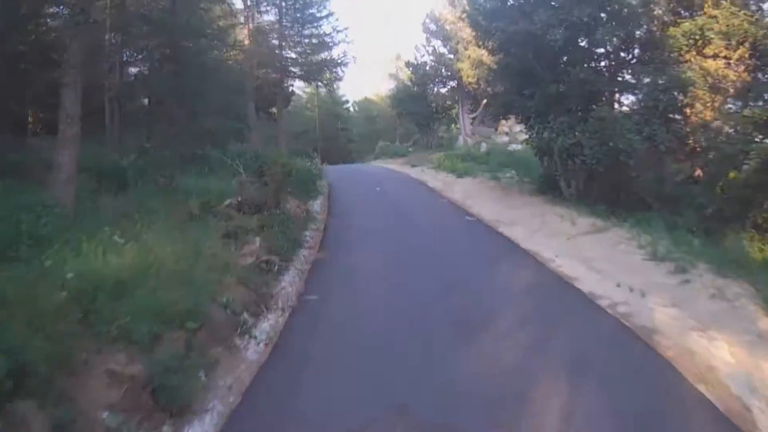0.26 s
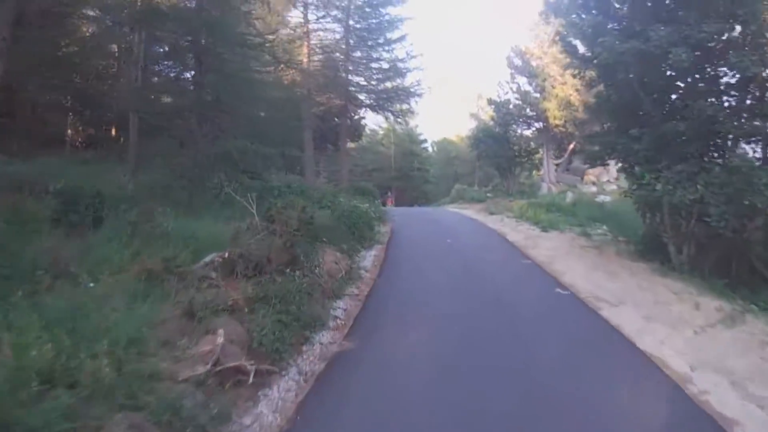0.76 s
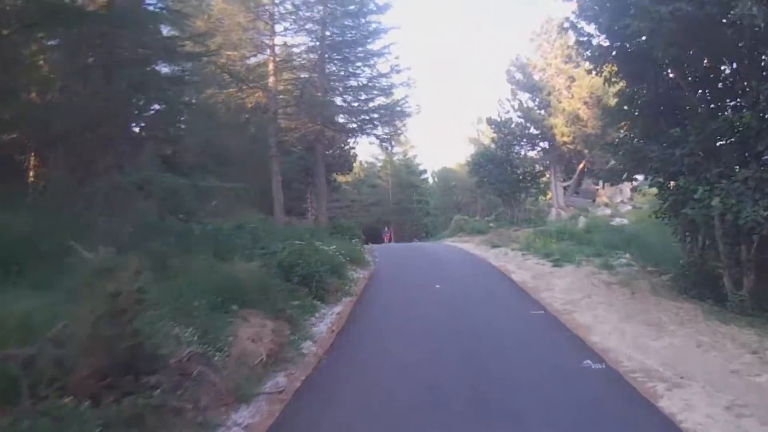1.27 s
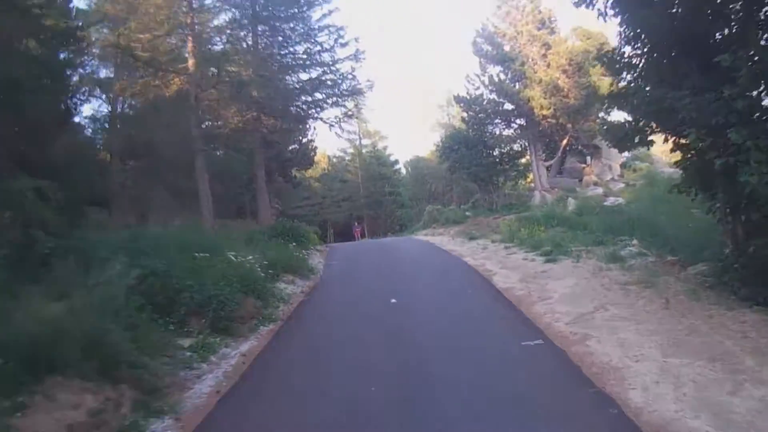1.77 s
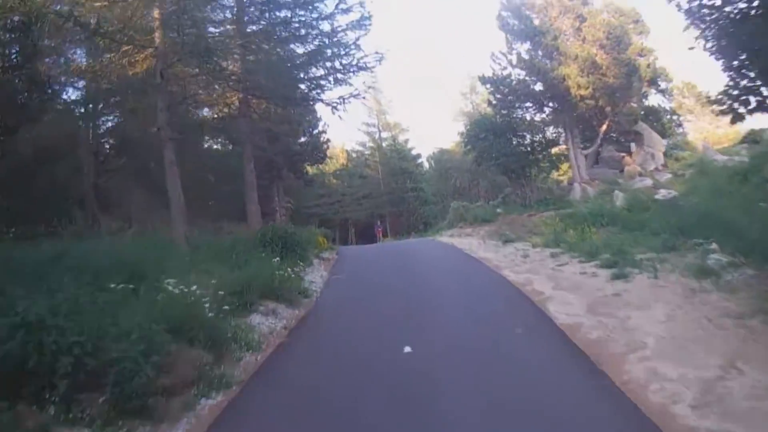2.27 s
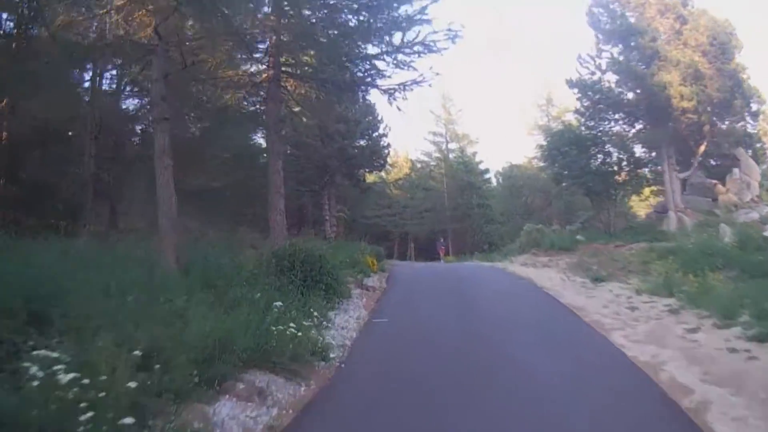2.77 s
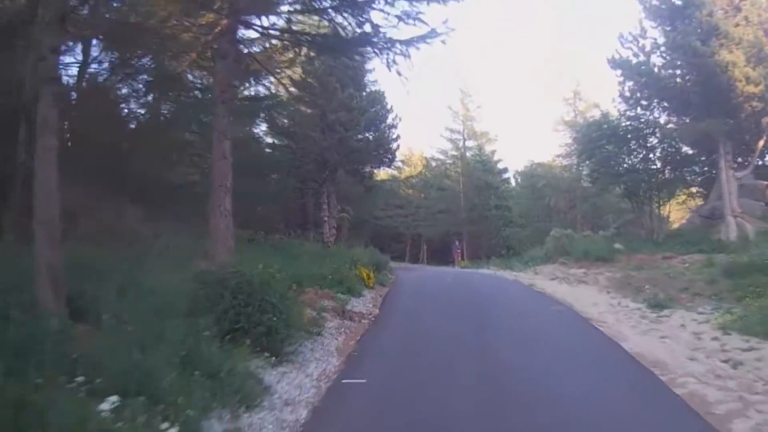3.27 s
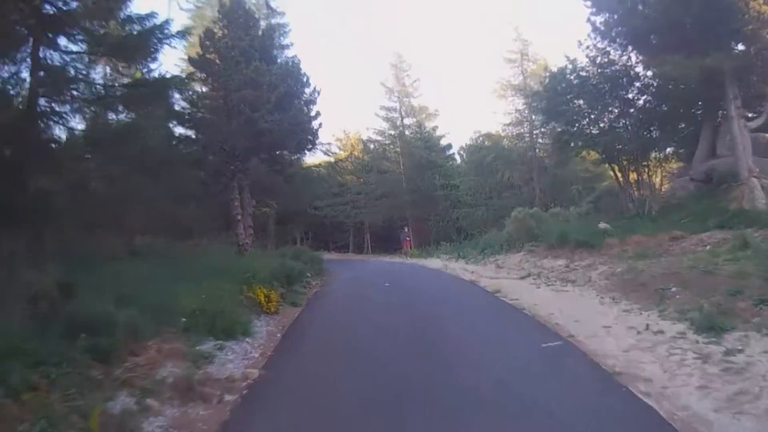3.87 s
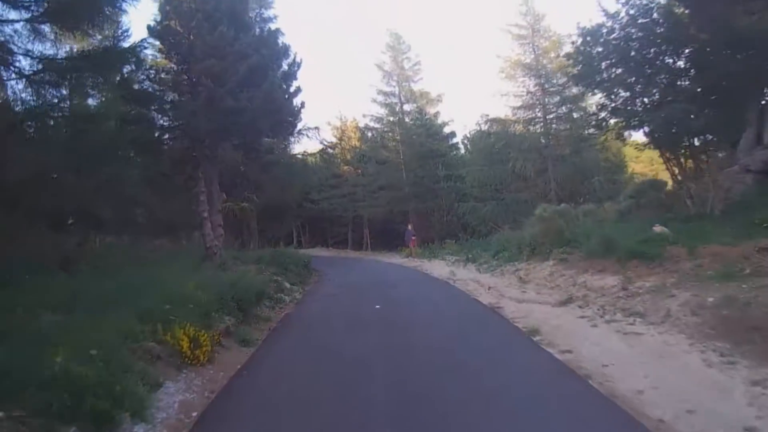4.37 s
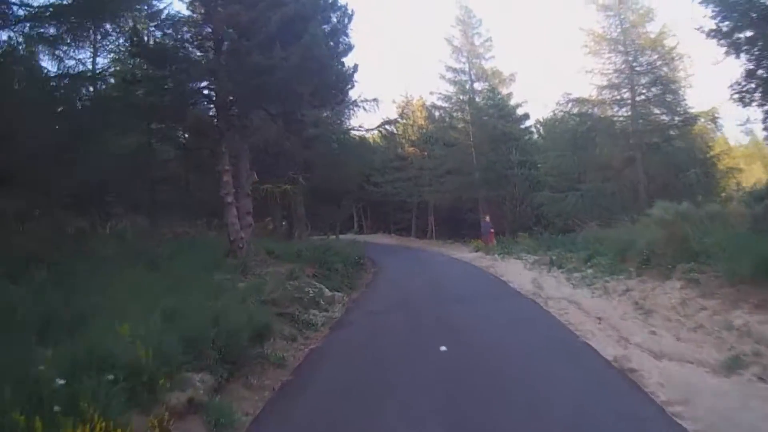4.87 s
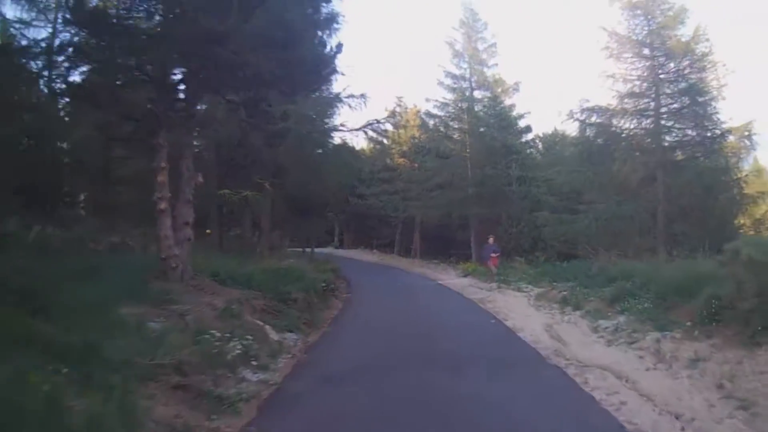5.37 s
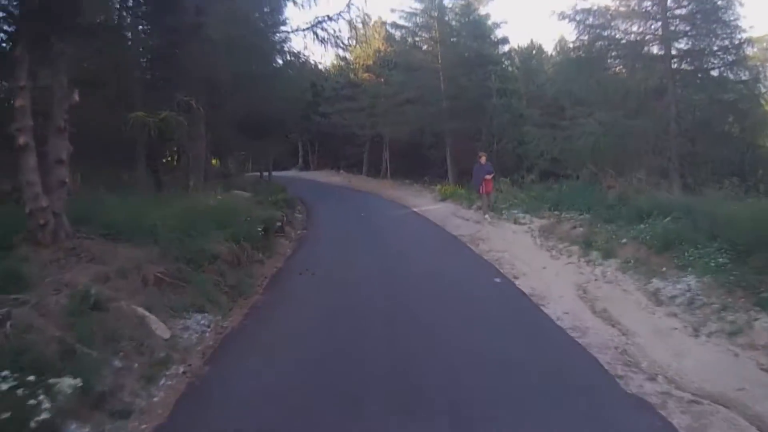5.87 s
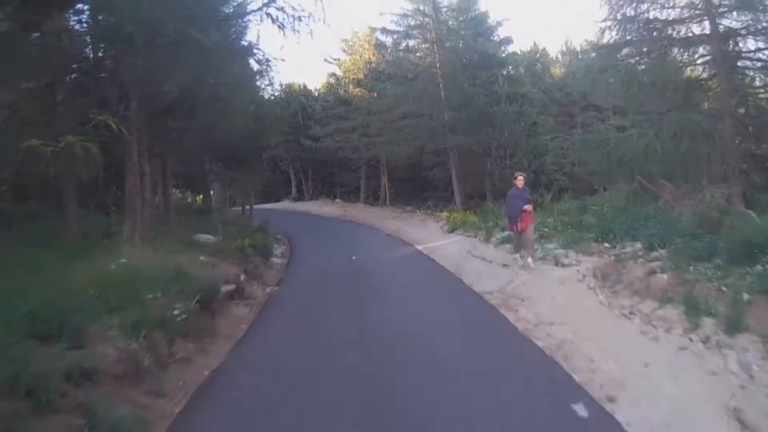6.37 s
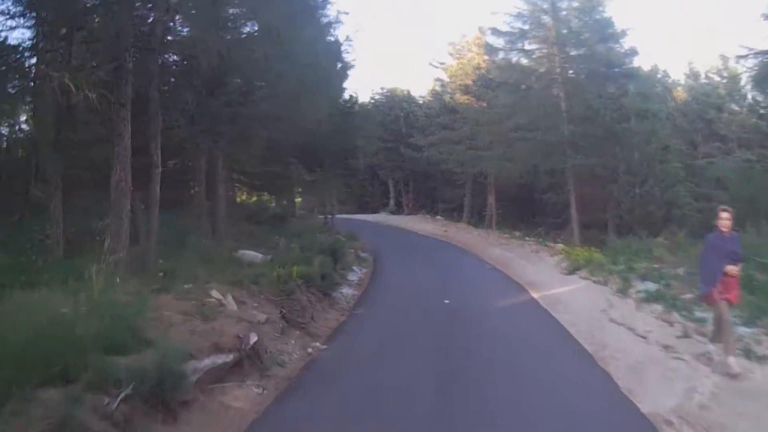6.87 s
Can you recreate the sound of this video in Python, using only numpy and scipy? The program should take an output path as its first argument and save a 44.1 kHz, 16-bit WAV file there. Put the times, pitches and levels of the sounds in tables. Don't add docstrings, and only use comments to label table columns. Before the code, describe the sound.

A longboard rolls along a paved forest road, low wooden rumble and dry gritty patter with small stone ticks and muffled wind buffeting.

```python
import sys
import numpy as np
from scipy import signal
from scipy.fft import rfft, irfft
from scipy.io import wavfile
from scipy.ndimage import uniform_filter1d, map_coordinates

SR = 44100
rng = np.random.default_rng(int(sys.argv[2]) if len(sys.argv) > 2 else 0)


def convert_level_to_amplitude(level_db):
    exponent = np.asarray(level_db, float) / 20
    return 10 ** exponent


def to_wav(sig):
    pcm = np.clip(np.atleast_2d(sig), -1, 1) * 32767
    pcm = np.round(pcm).astype(np.int16)
    wavfile.write(sys.argv[1], SR, pcm.T)


N = 313992


def unit(x):
    return x / np.sqrt(np.mean(x ** 2) + 1e-20)


def noise():
    return rng.standard_normal(N)


def wobble(rate):
    knots = rng.standard_normal(int(N * rate / SR) + 4)
    return map_coordinates(knots, [np.arange(N) * rate / SR])


def swing(table):
    return np.interp(np.arange(N) / SR, *np.transpose(table))


def coloured(x, spectrum):
    hz, db = np.transpose(spectrum)
    grid = np.fft.rfftfreq(8192, 1 / SR)
    gain = convert_level_to_amplitude(np.interp(np.log(grid + 1), np.log(hz + 1), db))
    ceps = irfft(np.log(gain + 1e-6))
    ceps[1:4096] *= 2
    ceps[4097:] = 0
    return signal.fftconvolve(x, irfft(np.exp(rfft(ceps))))[:N]


def patchy(depth_db):
    z = signal.stft(noise(), nperseg=1024)[2]
    field = uniform_filter1d(rng.standard_normal(z.shape), size=5, axis=0)
    field = uniform_filter1d(field, size=6, axis=1)
    return signal.istft(z * convert_level_to_amplitude(depth_db * unit(field)), nperseg=1024)[1][:N]


# start_s [s], load_db [dB]
BUMPS = [(.25, 2), (1.8, 1.5), (2.03, -3), (2.82, 2), (3.45, 2), (4.04, 1), (4.75, -1.5), (5.28, 0),
         (5.6, 0.5), (5.83, 3), (6.07, 4), (6.41, 1), (6.68, 1), (6.841, 4)]


def bumps():
    t, half_length_s = np.arange(N) / SR, 0.039
    return sum(db * np.exp(-((t - s) / half_length_s) ** 2 / 2) for s, db in BUMPS)


# start_s [s], level_db [dB]
ROAD = [(0, -64.5), (.44, -65.5), (.85, -68), (1.3, -66), (1.75, -64), (2.0, -63), (2.35, -62),
        (2.85, -61.5), (3.2, -65.5), (3.45, -63.5), (4.5, -62), (4.62, -58.5), (4.95, -59), (5.35, -63.5),
        (5.55, -60.5), (6.16, -59.5), (6.4, -63.5), (6.65, -56.5)]
# start_s [s], level_db [dB]
AIR = [(0.0, -46.5), (0.54, -46.5), (0.55, -41.5), (0.93, -49.5), (1.07, -41), (1.11, -48), (2.46, -44.5),
       (2.72, -41.5), (4.24, -46.5), (4.72, -37), (5.27, -47.5), (5.69, -42), (5.71, -46), (6.15, -41),
       (6.45, -47), (6.62, -38), (7.08, -42), (7.12, -39.5)]
# pitch_hz [Hz], level_db [dB per Hz]
DECK = [(40, -62.5), (110, -13), (190, -0.5), (300, -2.5), (430, -3), (550, -8), (700, -19), (880, -36),
        (1500, -64.5), (3000, -120)]
# pitch_hz [Hz], gain_db [dB]
HOUSING = [(100, -42), (500, -10.5), (900, -3.5), (1400, -3), (1880, -1.5), (2090, -6), (2470, -20),
           (3000, -28), (3350, -31.5), (3800, -26.5), (4400, -36), (7000, -44), (14000, -73)]


def wheels():
    jolt = wobble(22) + 1.3 * wobble(70)
    deck = unit(convert_level_to_amplitude(0.58 * jolt) * coloured(patchy(depth_db=-0.92), DECK))

    grains_per_s, spread_db, clump_db = 600, 2.5, 0.8
    chance, size = rng.random((2, N))
    sizes = (chance < grains_per_s / SR) * convert_level_to_amplitude(-spread_db * np.log(size + 0.063))
    crush = np.hanning(int(0.0022 * SR))
    grains = signal.fftconvolve(sizes, crush)[:N] * noise()
    bed = 0.88 * patchy(depth_db=1.5)
    grit = unit(coloured(convert_level_to_amplitude(clump_db * jolt) * (unit(grains) + bed), HOUSING))

    road, air, load = swing(ROAD), swing(AIR), bumps()
    deck_db = -39.5 + 0.52 * (road - road.mean()) + 0.18 * (air - air.mean())
    deck_db = deck_db + load - 0.03 * wobble(5)
    grit_db = road + 0.5 + 0.38 * load
    return convert_level_to_amplitude(deck_db) * deck + convert_level_to_amplitude(grit_db) * grit


PEBBLE_HZ = (1210, 2100)


def pebbles(count=140):
    place, size, sharp, tone = rng.random((count, 4)).T
    s = (np.arange(count) + place) / count * (N - 1) / SR
    road = swing(ROAD)[(s * SR).astype(int)]
    peak_db = road + 13.5 - 2 * np.log(size + 0.12)
    edge_db = -35 + 11 * (sharp - 0.5)
    return list(zip(s, peak_db, edge_db, np.interp(tone, [0, 1], PEBBLE_HZ)))


# start_s [s], peak_db [dB], edge_db (sharp edge) [dB above the peak], pitch_hz (ring) [Hz]
STONES = [(0.1365, -41, -21.5, 1690), (0.177, -42, -46, 1810), (0.5624, -40.5, -40, 1780),
          (1.0325, -42.5, -42, 1740), (1.5168, -39.5, -42, 1840), (1.8153, -39, -23, 1810),
          (4.432, -41, -30, 1940), (2.2967, -30.5, -26, 1750), (2.516, -40, -30, 1560),
          (2.5373, -42, -26, 1340), (2.614, -41.5, -38, 1820), (2.7564, -38.5, -31, 1850),
          (2.804, -39, -33, 1310), (3.2106, -43, -27, 1670), (3.2525, -41, -38, 1820),
          (3.4486, -43.5, -28, 1990), (3.6005, -34.5, -38, 1820), (3.6598, -34, -37, 1790),
          (4.1859, -37.5, -27, 1880), (4.482, -39.5, -20, 1890), (4.5675, -39, -28, 1610),
          (4.5999, -38.5, -36, 1610), (5.5707, -40.5, -35, 1650), (6.0287, -34.5, -31, 1780),
          (6.0622, -40, -22, 1840), (6.0945, -38, -26, 1410), (6.7448, -37, -27, 1780),
          (6.8294, -36, -36, 1930), (6.8877, -36.5, -24, 1350), (4.8499, -40, -30, 1900)]
# pitch_hz [Hz], level_db [dB per Hz]
EDGE = [(1000, -30), (2200, -3), (2800, 4.5), (3350, -1), (3900, -2), (4600, -10), (6500, -16.5),
        (8000, -27), (14000, -59)]


def stones():
    rings, edges, crunches = np.zeros((3, N + SR))
    t = np.arange(SR // 50) / SR
    ring_shape = convert_level_to_amplitude(-60 * t / 0.0062) * (1 - np.exp(-t / 0.0016)) ** 3
    crackle_shape = 0.091 * convert_level_to_amplitude(-60 * t / 0.0072)
    crunch_shape = convert_level_to_amplitude(6 - 60 * t / 0.013) * (1 - np.exp(-t / 0.0015))
    for s, db, edge_db, hz in STONES + pebbles():
        crack = rng.standard_normal(len(t))
        edge = (t == t[30]) + crackle_shape * crack
        edge = edge / np.linalg.norm(edge)
        here = slice(round(s * SR), round(s * SR) + len(t))
        rings[here] += convert_level_to_amplitude(db + 20) * np.sin(2 * np.pi * hz * t) * ring_shape
        edges[here] += convert_level_to_amplitude(db + edge_db + 23.5) * edge
        crunches[here] += convert_level_to_amplitude(db) * crunch_shape * crack[::-1]
    return rings[:N] + coloured(crunches[:N], HOUSING) + coloured(edges[:N], EDGE)


# pitch_hz [Hz], level_db [dB per Hz]
BUFFET = [(20, -61.5), (45, -24), (70, -8.5), (110, -2.5), (160, -2.5), (260, -16.5), (600, -50),
          (1000, -120)]
# pitch_hz [Hz], level_db [dB per Hz]
PUSH = [(8, -24.5), (20, -3), (45, -2), (65, -1.5), (110, -28), (300, -120)]


def wind():
    gust = convert_level_to_amplitude(swing(AIR) + 1.5 * wobble(6))
    lumps = unit(convert_level_to_amplitude(0.59 * wobble(14)) * coloured(patchy(depth_db=0.73), BUFFET))
    push = unit(convert_level_to_amplitude(1.8 * wobble(5)) * coloured(noise(), PUSH))
    slow_gust = uniform_filter1d(gust, size=SR // 2)
    return convert_level_to_amplitude(-0.7) * gust * lumps + convert_level_to_amplitude(-10.0) * slow_gust * push


# pitch_hz [Hz], level_db [dB per Hz]
HISS = [(1000, -6.5), (3000, -4.5), (5000, -4), (8000, -4), (10500, -4), (11500, 3), (12300, -8),
        (13000, -32.5)]
# multiple [times the base pitch], level_db [dB rms]
WHINE = [(2, -106), (3, -104), (4, -106), (5, -99)]


def electronics():
    whine_hz = 2303 + 4 * wobble(40) + 9 * wobble(250)
    twin_hz = 2280 + 7 * wobble(40) + 16 * wobble(250)
    turn = 2 * np.pi * np.cumsum(whine_hz) / SR
    twin = 2 * np.pi * np.cumsum(twin_hz) / SR
    whine = sum(convert_level_to_amplitude(db) * np.sqrt(2) * (np.sin(k * turn) + np.sin(k * twin)) for k, db in WHINE)
    return convert_level_to_amplitude(-85.5) * unit(coloured(noise(), HISS)) + whine


def scene():
    return (wheels() + stones() + wind() + electronics())[None]


def top_cut(x):
    return signal.sosfilt(signal.butter(12, 15700, fs=SR, output="sos"), x)


# pitch_hz [Hz], share [of frames]
EMPTY = [(5500, 0.028), (7000, .08), (8300, 0.23), (9200, .06), (10000, 0), (10900, 0.62), (11250, 0.18),
         (11800, 0.14), (12100, 0.37), (12600, .8), (13000, 0.73)]


def record(dry):
    hz, t, z = signal.stft(dry, SR, nperseg=2048)
    band = (hz // 230).astype(int)
    frames_held = 1 + rng.integers(2, size=len(t))
    draw = np.repeat(rng.random((band[-1] + 1, len(t))), frames_held, axis=1)[band, :len(t)]
    kept = draw > np.interp(hz, *np.transpose(EMPTY), left=0)[:, None]
    thinned = signal.istft(z * kept, SR, nperseg=2048)[1][:, :N]
    return top_cut(thinned + convert_level_to_amplitude(-99.0) * noise())


dry = scene()
out = record(dry)
to_wav(out)
```